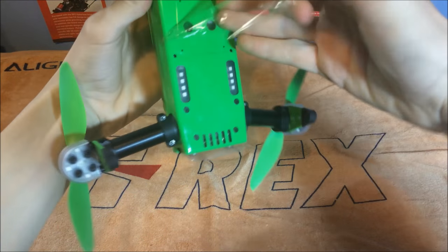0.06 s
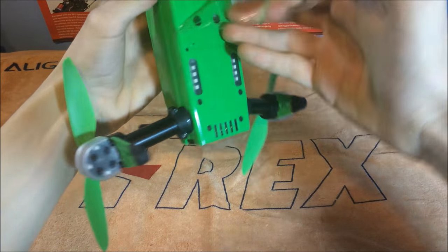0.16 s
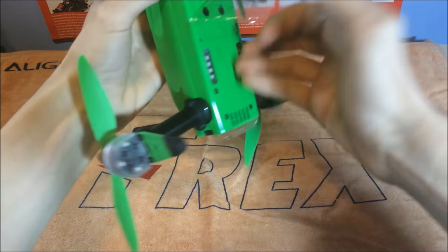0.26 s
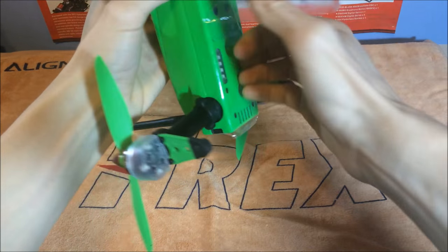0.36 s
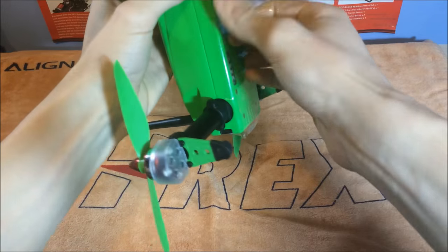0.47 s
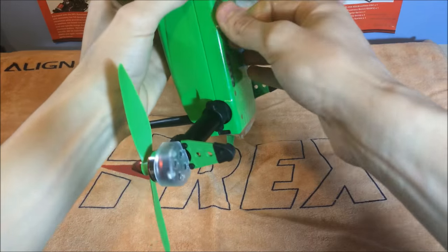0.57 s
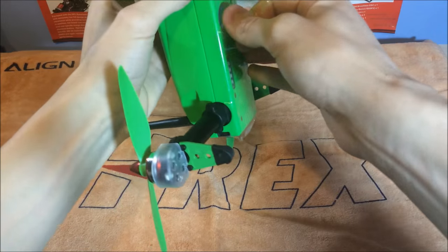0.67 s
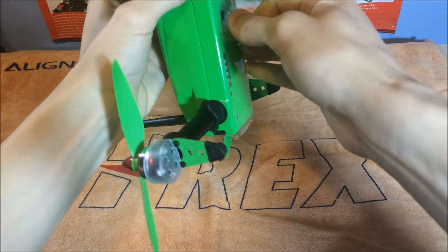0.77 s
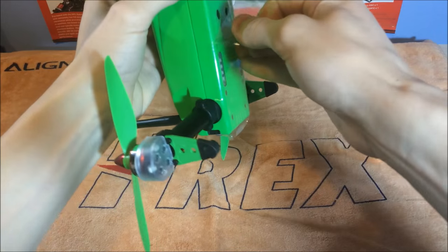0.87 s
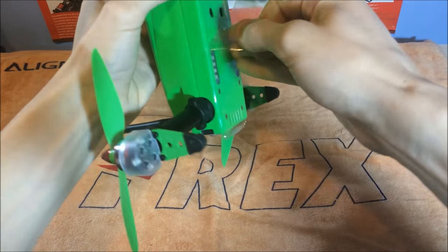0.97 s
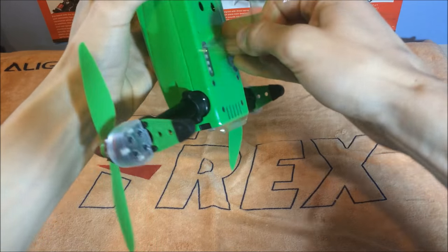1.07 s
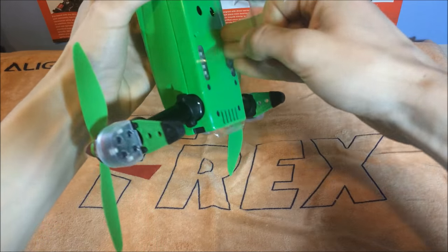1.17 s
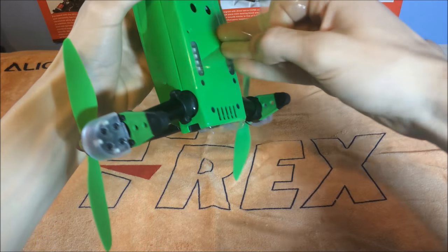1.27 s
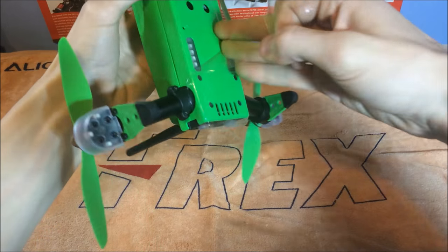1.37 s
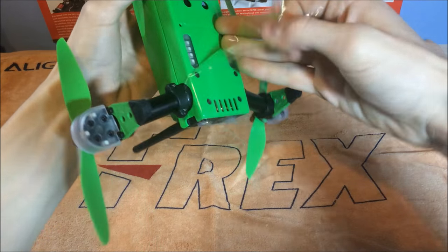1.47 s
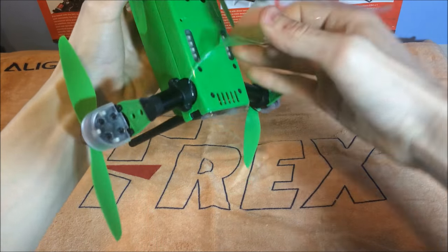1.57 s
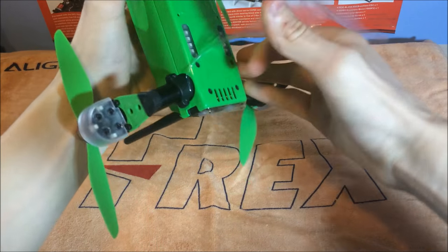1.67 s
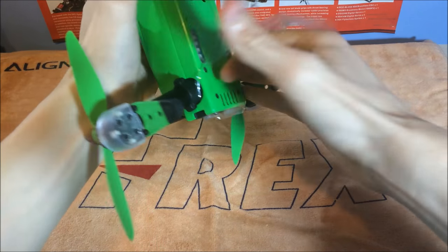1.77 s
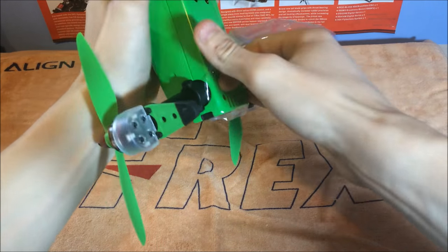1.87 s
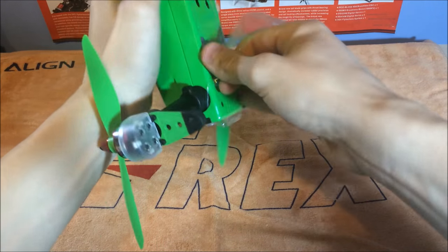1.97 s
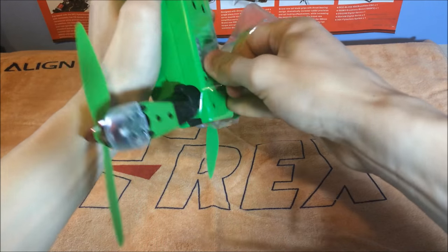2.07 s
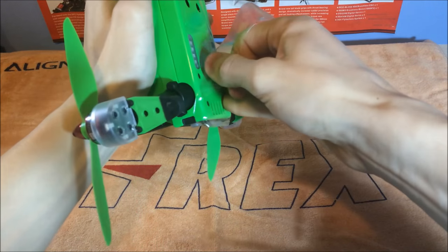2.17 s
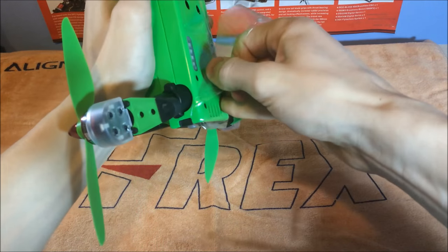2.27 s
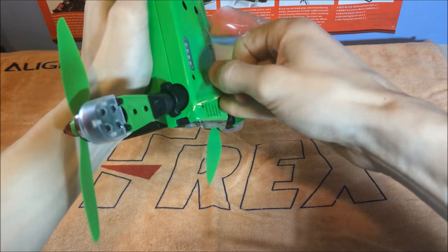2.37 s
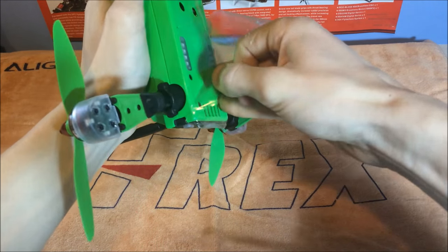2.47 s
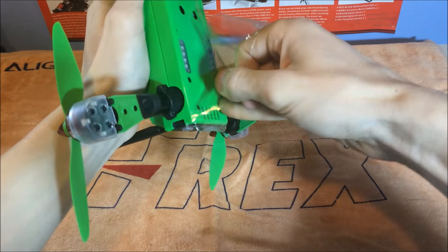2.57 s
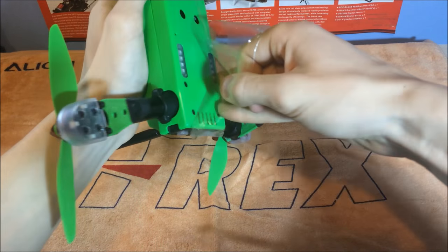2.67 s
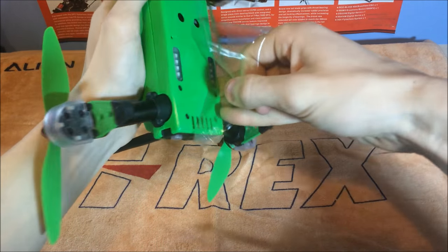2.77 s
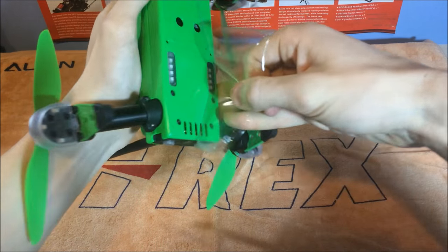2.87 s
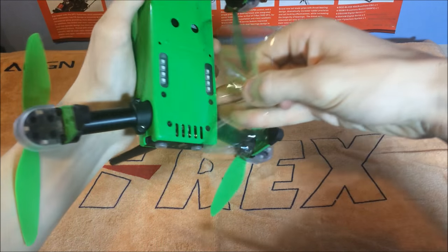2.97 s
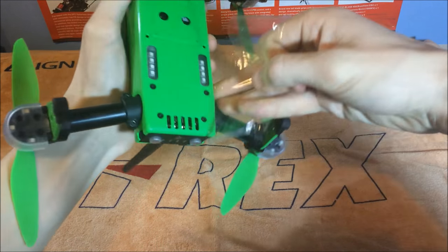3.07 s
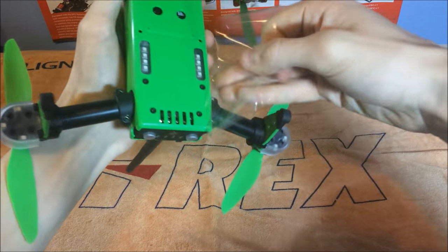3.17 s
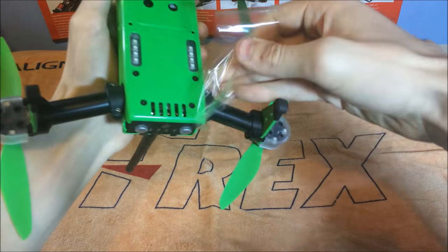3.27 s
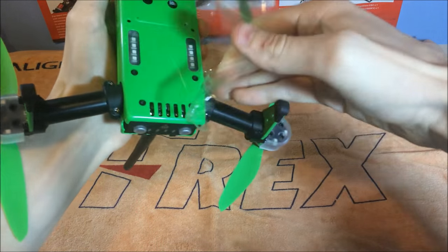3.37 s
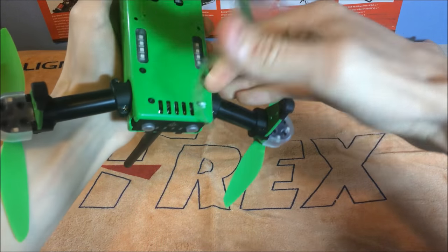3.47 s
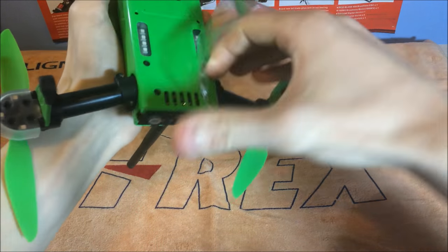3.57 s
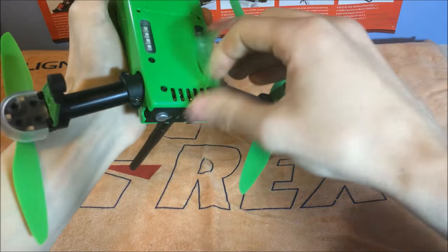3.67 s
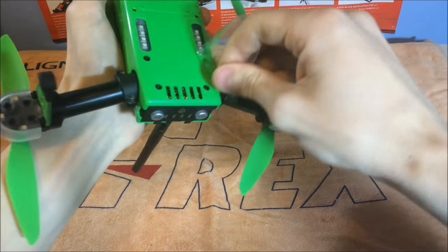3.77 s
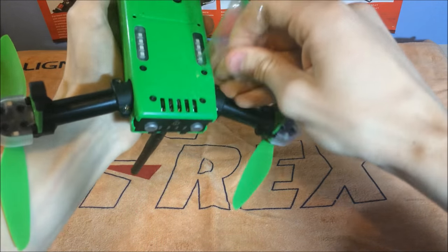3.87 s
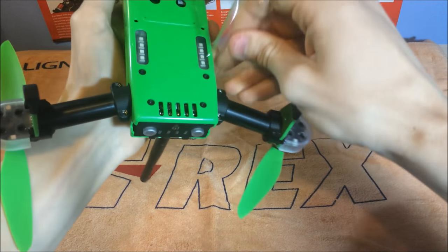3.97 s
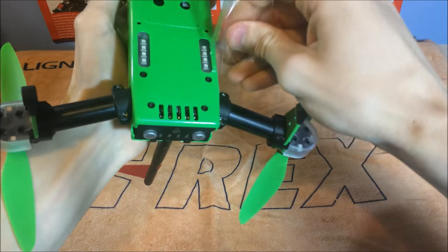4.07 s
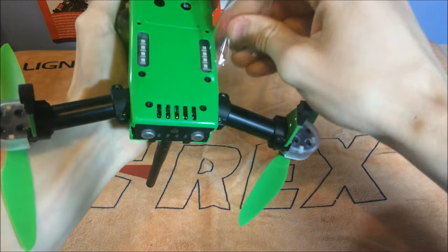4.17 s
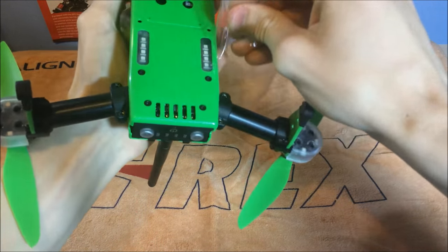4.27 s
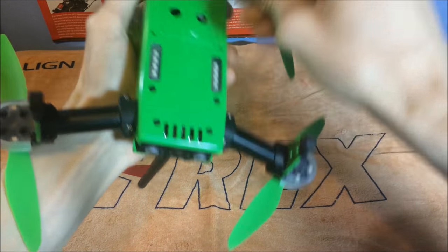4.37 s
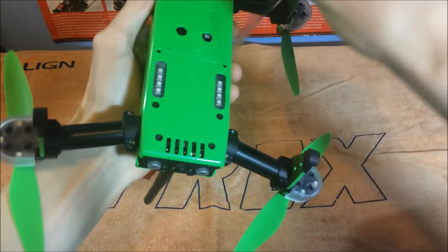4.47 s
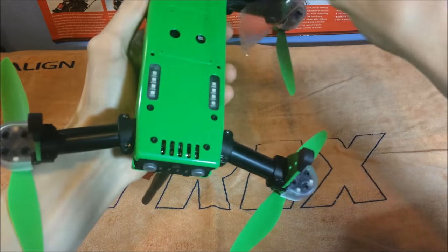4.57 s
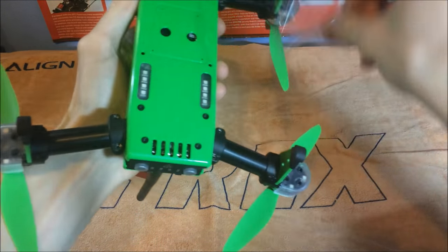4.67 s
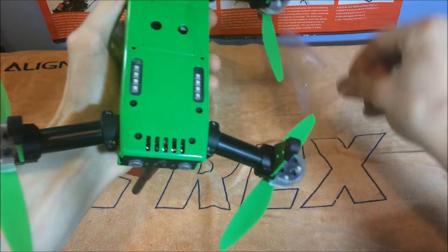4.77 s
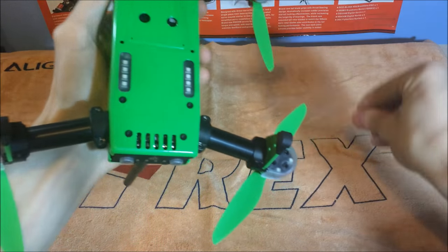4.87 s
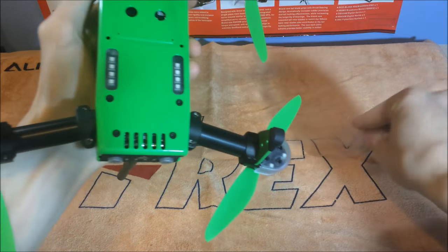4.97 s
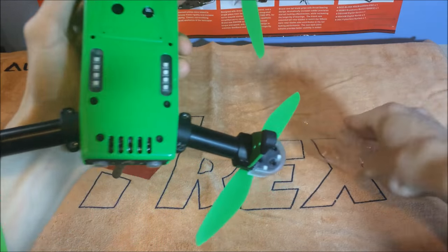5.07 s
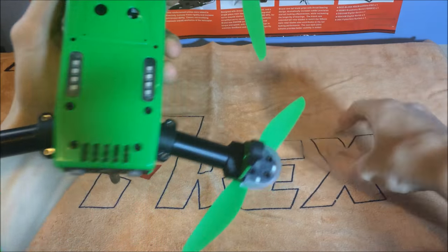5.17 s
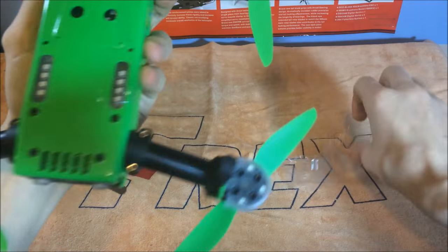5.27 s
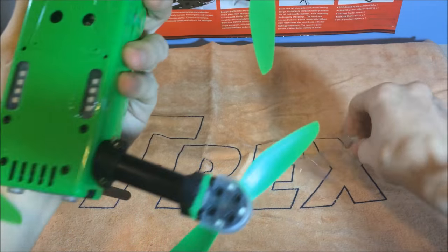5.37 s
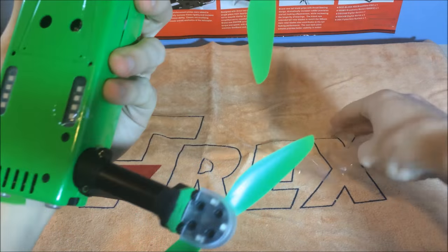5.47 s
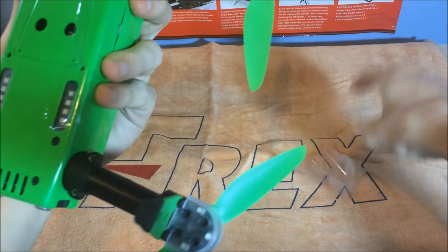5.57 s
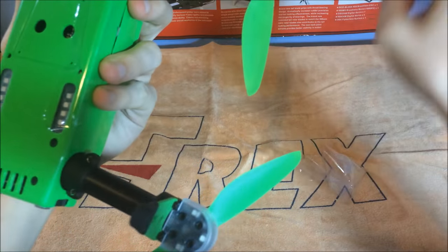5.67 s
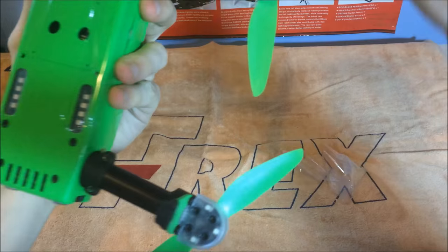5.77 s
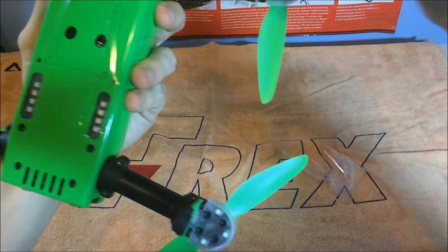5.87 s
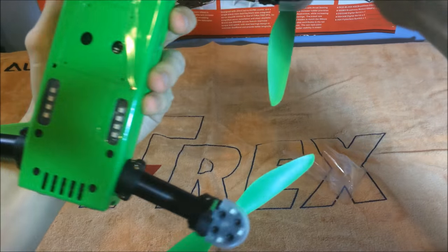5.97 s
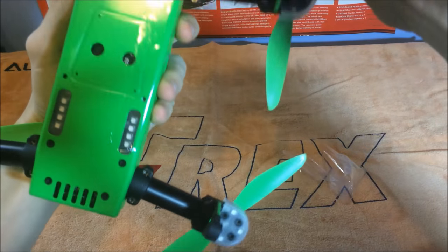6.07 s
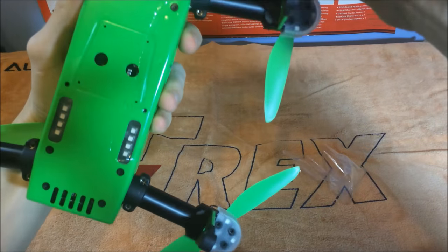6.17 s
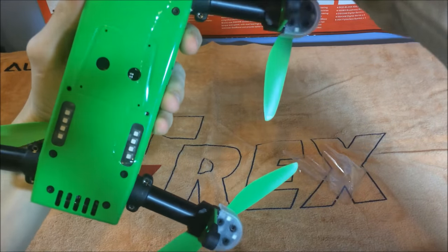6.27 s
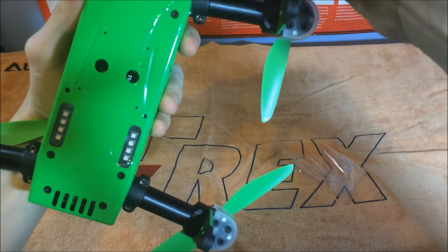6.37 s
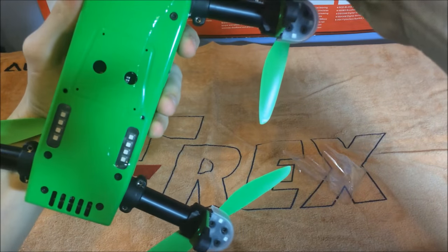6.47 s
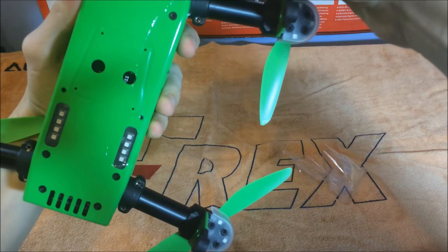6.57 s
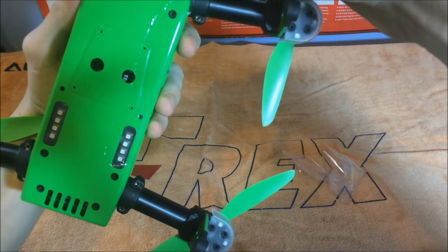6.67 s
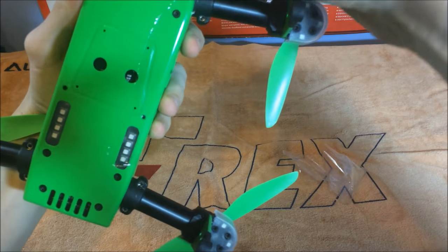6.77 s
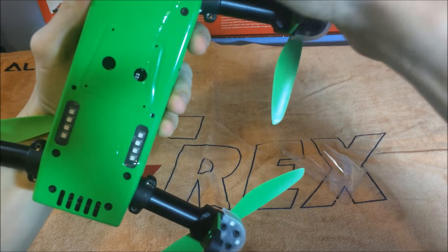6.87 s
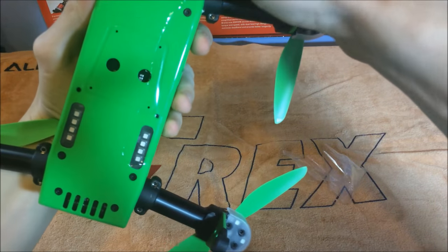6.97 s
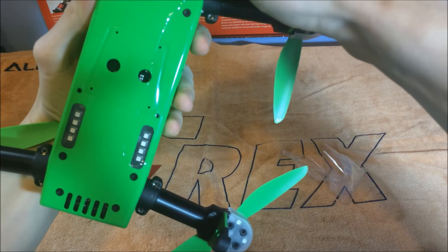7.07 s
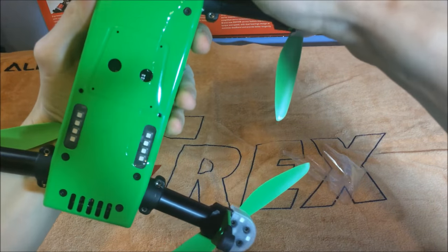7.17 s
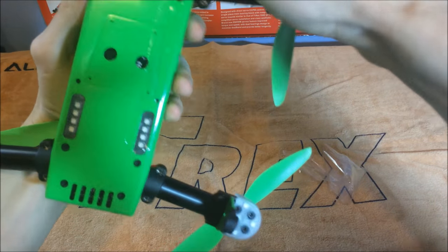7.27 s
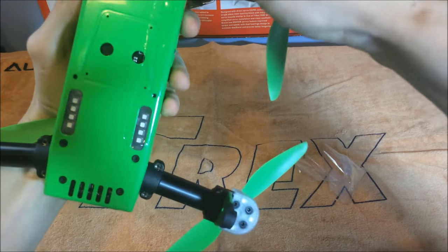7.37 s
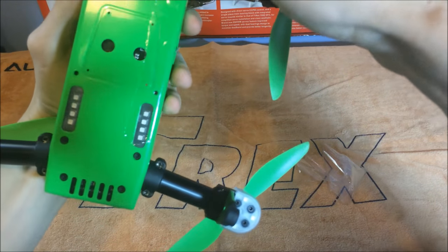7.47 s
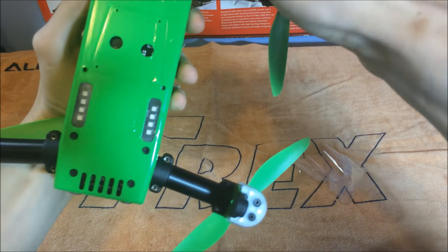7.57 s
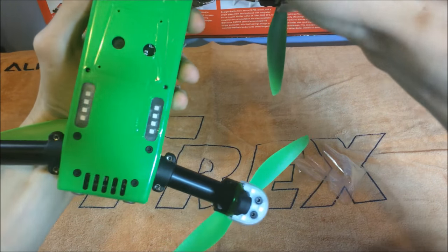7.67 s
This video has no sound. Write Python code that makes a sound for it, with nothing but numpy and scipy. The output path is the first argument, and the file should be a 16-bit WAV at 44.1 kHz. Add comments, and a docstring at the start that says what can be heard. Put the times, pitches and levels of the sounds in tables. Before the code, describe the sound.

Close up in a small quiet room, hands peel thin stiff plastic film from a hollow plastic drone shell. A quick burst of snaps opens, then sparse cracks and soft hissing pulls. After a quieter stretch comes a dense run of sharp crackles and crumpling. The film is dropped, leaving faint room noise, then a few dry clicks at the end.

```python
"""Small quiet room: clear protective film is peeled off the plastic shell of a small drone, close by.
Each pull parts the glue in a fine hiss of random clicks; the stiff film buckles in snaps, crumples and ticks,
all of them short excitations filtered by the resonances of film and shell.
Dragged film draws out rough narrow-band notes; hands bump the hollow shell as damped sines.
The room answers the film; low grip rustle, room noise and a faint whine lie beneath."""
import sys
import numpy as np
from scipy import signal
from scipy.fft import rfft, irfft
from scipy.io import wavfile
from scipy.ndimage import uniform_filter1d

SR = 44100
rng = np.random.default_rng(int(sys.argv[2]) if len(sys.argv) > 2 else 0)


def wav_out(sig):
    """Save sig, one row per channel (or a flat mono array), as 16-bit PCM at SR to the path in sys.argv[1]."""
    wavfile.write(sys.argv[1], SR, np.round(np.clip(np.atleast_2d(sig).T, -1, 1) * 32767).astype(np.int16))


N = 340452
EDGE_HZ = 15500
TAPS = 2048
HZ = np.fft.rfftfreq(TAPS, 1 / SR)
TIME = np.arange(N) / SR


def gain_of(db):
    """Decibels to amplitude."""
    return 10 ** (np.asarray(db) / 20)


def evened(x):
    """Scales to rms 1."""
    return x / np.sqrt(np.mean(x ** 2) + 1e-20)


def read(points, hz):
    """Reads a table along a log-frequency axis."""
    f, value = np.transpose(points)
    return np.interp(np.log(hz + 1), np.log(f + 1), value)


def add(mix, s, sound):
    """Mixes a sound in at time s."""
    part = mix[max(round(s * SR), 0):][:len(sound)]
    part += sound[:len(part)]


def noise(points):
    """Steady noise of rms 1 with the given spectrum."""
    gain = gain_of(read(points, np.fft.rfftfreq(N, 1 / SR)))
    return evened(irfft(rfft(rng.standard_normal(N)) * gain, N))


def ringing(db):
    """Causal (minimum-phase) impulse response of energy 1 with the given spectrum."""
    log_gain = np.log(gain_of(np.concatenate([db, db[-2:0:-1]])))
    min_phase = np.exp(np.conj(signal.hilbert(log_gain)))
    response = np.fft.ifft(min_phase).real[:TAPS // 2]
    return response / np.linalg.norm(response)


def peak(hz, width_hz):
    """Bell of height 1 around a frequency."""
    return 1 / (1 + (2 * (HZ - hz) / width_hz) ** 2)


def crease(hz, lift_db, octaves):
    """The broad resonance of one facet of film, in dB."""
    return lift_db / (1 + (np.log2((HZ + 1) / hz) / octaves) ** 2)


def colour(s, body_db, bright_db, shell_share, hollow_db=8, slope_db_per_octave=7):
    """Film spectrum in dB at time s: slack patches have body, taut ones are bright, stuck ones ring the shell."""
    # Film colour: freq_hz, density_db (relative, per Hz)
    film_points = [(60, -6.5), (450, -6), (750, 0.5), (1300, 1), (1800, -0.5), (2900, -2), (4700, -2),
                   (7500, 3), (9700, 0.5), (12500, 3), (15200, -2.5)]
    # Resonances of the hollow shell under the film: freq_hz, width_hz, lift_db (at shell_share 1)
    shell_peaks = [(1040, 110, 1.5), (1362, 180, 0.5), (2300, 200, 5.5), (2890, 150, 6.5), (3263, 400, 7.5),
                   (4065, 690, 5), (5800, 250, 4), (7300, 430, 1.5)]
    # Loose flap, lower as it grows, higher again once crumpled: time_s, lowest_resonance_hz
    flap_points = [(0, 680), (1.9, 726), (2.3, 500), (4.8, 416), (5.5, 546)]
    flap_hz = np.interp(s, *np.transpose(flap_points))
    flap = 4 * peak(flap_hz, width_hz=190)
    flap -= hollow_db * peak(566 + .42 * flap_hz, width_hz=130)  # dip above the resonance
    # the flap radiates little below its lowest resonance
    flap -= slope_db_per_octave * np.clip(np.log2(flap_hz / (HZ + 1)), 0, 4)
    low = read([(1000, 1), (2400, 0)], HZ)
    high = read([(3400, 0.063), (11500, 0.93)], HZ)
    shell = sum(db * peak(hz, width_hz) for hz, width_hz, db in shell_peaks)
    top = np.clip((HZ - EDGE_HZ) / 50, 0, 30)
    return read(film_points, HZ) + flap + body_db * low + bright_db * high + shell_share * shell - top


def grains(size, per_s, spread_db):
    """Random tiny clicks, a few of them much larger than the rest; rms 1."""
    sizes = gain_of(spread_db * np.minimum(rng.exponential(1, size), 4))
    return evened(sizes * rng.choice([-1, 1], size) * (rng.random(size) < per_s / SR))


def swell(start_s, end_s, rise_db_per_s, fall_db_per_s, t, build_db=0):
    """Gain of one hand movement: swells up to its start, holds or builds, dies away after its end."""
    hold_db = build_db * (np.clip((t - start_s) / (end_s - start_s), 0, 1) - .5)
    rise_db = rise_db_per_s * np.maximum(start_s - t, 0)
    fall_db = fall_db_per_s * np.maximum(t - end_s, 0)
    return gain_of(hold_db - rise_db - fall_db)


def snaps(crack=5, flutter_db=-19, flutter_s=0.0065, shell_share=0.61, room_share=.9):
    """A facet flips with one crack, rattles briefly and flutters on. Rows: to the microphone, into the room."""
    # One buckle of film or tick of shell: start_s, energy_db (over 1 ms), body_db (lift below 1 kHz),
    # bright_db (lift toward 11.5 kHz), facet_hz, rattle_ms (scales rattle rise and decay, at least .25)
    snap_rows = [(0.181, -31, 0, -24, 2190, .6), (0.2088, -21.5, 7.5, -12, 4000, 1.1),
                 (0.2126, -12.5, 7.5, 2.5, 3230, 1.7), (0.226, -16.5, -22, -4, 10200, 0.36),
                 (0.2328, -14.5, -27, 5, 8050, 0.37), (0.2406, -15, -10, 6, 8250, .75),
                 (0.2464, -17, -19, -6, 6030, 3.6), (0.2601, -15, -27, 0.5, 2920, 1.5),
                 (0.288, -20.5, 2, -10, 750, 2.1), (0.305, -24.5, -10, -5, 3470, 2.1),
                 (0.362, -42.5, -15, -11, 2950, 1.1), (0.411, -38.5, -1, -12, 3530, 1.9),
                 (0.6439, -30, -3, -8.5, 7680, .6), (0.6475, -18, -4.5, -9, 3120, 0.77),
                 (0.7103, -23.5, 3, -15.5, 2650, 2.3), (0.7812, -14, -0.5, -14, 2600, 0.28),
                 (0.8285, -36, -6, -11.5, 7880, .5), (0.9154, -27, 1.5, -27, 2380, 1.3),
                 (0.9563, -20.5, -10, 2, 10360, .5), (0.9653, -6.5, -0.5, -6.5, 3370, .6),
                 (0.9721, -15, -2.5, -12.5, 4470, 3.8), (1.036, -29, 1, -12, 3230, 2),
                 (1.0721, -30, -10, 10, 7840, .5), (1.1278, -20, 2.5, -6, 1060, 0.85),
                 (1.1752, -12.5, 2, -11, 12000, 0.66), (1.5156, -33, -15, -12, 12830, .4),
                 (1.6482, -32.5, -4, -18, 3070, 1.1), (1.6792, -23.5, -9, -19, 2270, 1.8),
                 (1.704, -30.5, -15, -12, 2300, 1.1), (1.8665, -40, -24, -10, 3500, 0.99),
                 (1.885, -27.5, 5.5, -14, 2480, 3.6), (2.071, -25, -11, -29, 2820, 0.7),
                 (2.0754, -23, -4.5, -11.5, 3070, 2.5), (2.1107, -31, -21, -33, 2740, 1.1),
                 (2.1408, -31, 3.5, -30, 2840, .9), (2.233, -36.5, -4, -17, 2580, 1.4),
                 (2.38, -40, 8, -37, 2360, 1), (2.581, -19.5, -12, -12.5, 11800, 0.49),
                 (2.624, -23.5, -5, -10.5, 2330, 2.6), (2.737, -32.5, -26, 4, 6640, 0.96),
                 (2.7912, -23.5, 1.5, -2.5, 9400, 2.7), (2.8111, -26, -3, -6.5, 9800, 2.1),
                 (3.0883, -29.5, -22, -9, 6060, 1.1), (3.1382, -26, -5.5, -7, 2880, 0.82),
                 (3.1716, -19.5, -4, -3, 6200, 1.8), (3.1996, -30.5, -6, -11.5, 2793, 2.2),
                 (3.2584, -34, 7, -17, 2450, 2.1), (3.286, -40.5, 1.5, -5.5, 6200, .75),
                 (3.3112, -29.5, -2, -3.5, 2540, 1.7), (3.3335, -25, -11, 9, 7450, 1),
                 (3.357, -32, -2.5, -3.5, 8180, .5), (3.3719, -20, -2.5, -9, 3420, .7),
                 (3.396, -29.5, -16, -6, 2410, 1.1), (3.4242, -8.5, -3.5, -3.5, 8700, 1.2),
                 (3.4377, -15, -6.5, -16, 2810, 1.2), (3.4405, -10.5, -12.5, -1.5, 2770, 1.2),
                 (3.4717, -12, -3.5, -10.5, 2220, 0.87), (3.4875, -15, -6.5, -10.5, 5840, 3),
                 (3.5103, -20.5, -3.5, -9.5, 7840, .8), (3.5388, -19, -3, -1, 7400, 0.61),
                 (3.5486, -16, -4, -11, 5500, 2.3), (3.6383, -34, -13, 6, 6850, 2.3),
                 (3.6772, -39.5, -4.5, -13.5, 3880, 1.4), (3.743, -32.5, 1.5, -11, 2863, 2.1),
                 (3.831, -24.5, -10, -7, 3050, 1.1), (3.8464, -17.5, -14.5, 8, 12920, 0.44),
                 (3.8588, -12.5, -7, -2, 13450, .8), (3.8918, -20.5, -8, 4, 6190, .45),
                 (3.9263, -14, -13.5, -10.5, 4900, .5), (3.9813, -24, -6, -0.5, 5200, .3),
                 (4.0312, -13.5, -7, -9, 7400, .3), (4.034, -15, -8.5, -11.5, 11800, 0.62),
                 (4.0994, -24.5, 2.5, -10, 4600, .6), (4.109, -30, -2.5, -13.5, 2280, .85),
                 (4.1501, -21, .5, -6.5, 11240, .25), (4.201, -14, -28.5, 4, 11600, .6),
                 (4.2246, -31.5, -9, -14.5, 4103, 1.2), (4.2303, -19, -14.5, -0.5, 5400, 1.1),
                 (4.2568, -16, -4, 4, 5510, 1.8), (4.2763, -21, -5, -18.5, 7410, .8),
                 (4.3665, -28.5, -5.5, -9.5, 2080, 3.3), (4.387, -39.5, -16, -5.5, 4050, .9),
                 (4.4748, -28.5, -5.5, -11.5, 1940, 1.6), (4.4795, -9, -8.5, -1.5, 5270, 0.52),
                 (4.4871, -21.5, -2, -7.5, 5370, 1.3), (4.6081, -26, -9, -13.5, 12450, 2.5),
                 (4.697, -29.5, 0, 2, 7970, 0.68), (4.7036, -24.5, -4, -15, 1920, 2.4),
                 (4.7318, -28.5, -3, -6, 6300, 1.5), (4.7547, -27, -5, -25, 2090, 1.7),
                 (4.8402, -13.5, -5, -3, 2520, 2), (4.9187, -30.5, -5, -10, 2430, 2.7),
                 (4.9597, -32, -12, -7, 8550, 1.8), (5.0036, -32.5, -14, -9, 3250, 0.51),
                 (5.028, -26, -11, -8, 7200, 2.5), (5.0338, -18.5, -27, -6, 11100, 1),
                 (5.0527, -20.5, 5.5, 4, 7300, 2.05), (5.1292, -18, -10.5, -3, 3330, 3.3),
                 (5.1443, -21.5, -25, -4.5, 3010, 1.9), (5.1643, -19, -9, 5, 12000, .7),
                 (5.2175, -38, -3, 6, 9000, 1.9), (5.2641, -29, -8, -22, 2600, 1.3),
                 (5.375, -32.5, -4.5, -.5, 9700, 1), (5.5114, -27, -7.5, -4.5, 12580, 3),
                 (5.5633, -8.5, -14.5, -8, 6170, 0.31), (5.689, -41, 6, 0, 6290, 1.9),
                 (5.8176, -51, 1, -1, 2350, 1), (6.0535, -50, 5, 9, 728, 2),
                 (6.611, -49.5, -4.5, 6, 5660, 1.5), (6.6926, -51, 1, -1, 7120, .5),
                 (6.8511, -52.5, 2, -4.5, 12530, .7), (6.9163, -47.5, 0.5, -4, 10500, .7),
                 (6.9354, -49.5, 3, -37, 1244, 1.8), (7.3616, -28.5, -4, -6, 1850, 0.57),
                 (7.4003, -14, 2, -6.5, 13600, 0.4), (7.47, -30, -13, -6, 7800, .25),
                 (7.537, -20, -6.5, 1, 6900, 0.79)]
    out, t = np.zeros((2, N)), np.arange(TAPS // 2) / SR
    for s, db, body_db, bright_db, facet_hz, ms in snap_rows:
        scale_s = max(ms, .25) / 1000
        onset = 1 - np.exp(-t / (.3 * scale_s))
        burst = np.exp(-t / (1.4 * scale_s))
        rattle = onset * (burst + gain_of(flutter_db) * np.exp(-t / flutter_s))
        beamed = colour(s, body_db, bright_db, shell_share)
        beamed = beamed + crease(facet_hz, lift_db=10.0, octaves=0.19)
        # summed over all directions, the colour of a single facet evens out
        spread = colour(s, room_share * body_db, room_share * bright_db, shell_share)
        spread = spread + crease(facet_hz, lift_db=5.0, octaves=0.31)
        for path, spectrum in zip(out, (beamed, spread)):
            drive = rng.standard_normal(len(t)) * rattle
            drive[0] = -crack
            snap = signal.fftconvolve(drive, ringing(spectrum))
            snap *= np.sqrt(SR / 1000) / np.linalg.norm(snap)  # rms 1 if spread over 1 ms
            add(path, s, gain_of(db) * snap)
    return out


def crumples(trim_db=-1, shell_share=0.78, buckles=20, facets=4):
    """Facets of random pitch each buckle about as often in any fold: quick folds tear, slow ones crackle."""
    # Runs of tiny buckles as the film folds: start_s, end_s, level_db (before trim_db),
    # body_db (lift below 1 kHz), bright_db (lift toward 11.5 kHz)
    fold_rows = [(0.197, 0.275, -33.5, -4.5, -12), (1.638, 1.72, -46.5, -0.5, -15),
                 (1.749, 1.801, -40, 5, -9), (2.064, 2.09, -34, -2.5, -14), (2.128, 2.152, -42, -4, -34),
                 (3.295, 3.355, -42.5, -14, -8), (3.425, 3.445, -24.5, -2, -3),
                 (3.462, 3.485, -19.5, 3, -8.5), (3.49, 3.517, -25.5, -9, -4.5),
                 (3.84, 3.868, -31, -7.5, -2.5), (3.921, 3.929, -25, -1, -12),
                 (4.255, 4.299, -40, -3.5, -7), (4.767, 4.799, -33.5, 1, -11), (4.808, 4.857, -30, -4, -8),
                 (4.86, 4.9, -42, -23, -11), (5.029, 5.072, -42, -5, -22),
                 (5.121, 5.162, -31.5, -4.5, -1.5), (5.284, 5.324, -44, 6.5, -12),
                 (5.365, 5.387, -40, -4, -10), (5.43, 5.466, -43.5, 0, -7), (5.53, 5.571, -41, 8, 9),
                 (5.556, 5.576, -24, -6.5, 0.5), (6.413, 6.447, -63.5, 3.5, -19.5),
                 (7.194, 7.249, -64.5, 3, -19.5), (7.642, 7.664, -56, 8.5, -7)]
    out = np.zeros(N)
    for start_s, end_s, db, body_db, bright_db in fold_rows:
        size, run = int(max(end_s - start_s, .004) * SR), 0
        film = colour(start_s, body_db, bright_db, shell_share)
        for hz in np.exp(rng.uniform(np.log(2000), np.log(12000), facets)):
            clicks = grains(size, per_s=buckles * SR / size, spread_db=3.0)
            clicks = clicks * signal.windows.tukey(size, .3)
            facet = ringing(film + crease(hz, lift_db=5.0, octaves=0.13))
            run = run + signal.fftconvolve(clicks, facet)
        run = run * np.sqrt(size / (np.sum(run ** 2) + 1e-20))
        add(out, start_s, gain_of(db + trim_db) * run)
    return out


def pulling(t):
    """Strength, body dB and bright dB of the sliding film at times t; colour is weighted by pull power."""
    # Pulls dragging film off the shell and through the fingers: start_s, end_s,
    # level_db (relative strength), body_db (lift below 1 kHz), bright_db (lift toward 11.5 kHz)
    pull_rows = [(0, 0.104, -46, 6, -9), (0.44, 0.555, -59.5, 8.5, 2), (0.684, 0.703, -48, 1.5, -18),
                 (0.86, 0.96, -50.5, -2, -4.5), (1.01, 1.195, -42, 3.5, -1), (1.326, 1.529, -47.5, 3, -7.5),
                 (1.645, 1.767, -51.5, 6.5, -10), (1.9, 1.948, -55.5, 7.5, -20),
                 (2.058, 2.252, -53, 3.5, -10), (2.253, 2.41, -60.5, -1, 5), (2.444, 2.613, -51, 2.5, 4),
                 (2.789, 2.846, -48, -1, -4.5), (2.922, 2.922, -42.5, -1, -13), (2.962, 3.027, -49, 1, -1),
                 (3.052, 3.162, -44.5, 5, -4), (3.397, 3.603, -45, -5, -21),
                 (3.733, 3.88, -56.5, -0.5, -2.5), (3.92, 4.02, -39, -4, -7),
                 (4.104, 4.128, -47.5, -3.5, -5), (4.353, 4.555, -59.5, -1.5, -6.5),
                 (4.692, 4.918, -47, -4, -11), (5.07, 5.15, -40.5, -5, -7), (5.233, 5.443, -55, -1, -6),
                 (5.483, 5.633, -49, 1.5, -4)]
    # last row: the film whispers in the fingers until it is dropped
    rows = np.array(pull_rows + [(0.0035, 5.68, -65.5, 2, -0.5)])
    rise_db_per_s, fall_db_per_s, build_db = 329.5, 261.5, 0.5  # builds with the tension
    gains = [swell(start_s, end_s, rise_db_per_s, fall_db_per_s, t, build_db) * gain_of(db)
             for start_s, end_s, db in rows[:, :3]]
    power = np.array(gains) ** 2
    total = power.sum(0) + 1e-20
    return np.sqrt(total), rows[:, 3] @ power / total, rows[:, 4] @ power / total


def peel(trim_db=-3.0, shell_share=0.96, stutter_db=2.1, size=512):
    """Thousands of glue threads part each second; the pull sticks and slips a little."""
    stutter = uniform_filter1d(rng.standard_normal(N), size=300)
    stutter = evened(uniform_filter1d(stutter, size=300))
    threads = grains(N, per_s=12000, spread_db=1.5) * gain_of(stutter_db * stutter)
    _, t, z = signal.stft(threads, SR, nperseg=size, nfft=TAPS)
    strength, body_db, bright_db = pulling(t)
    shape = gain_of(colour(t[:, None], body_db[:, None], bright_db[:, None], shell_share))
    shape /= np.sqrt(np.mean(shape ** 2, axis=1, keepdims=True))
    hiss = signal.istft(z * shape.T, SR, nperseg=size, nfft=TAPS)[1][:N]
    return evened(hiss) * np.interp(TIME, t, strength) * gain_of(trim_db)


def ticks(moving_db=-12, settle_db=-82, facets=14):
    """Stray small creases tick all over the sheet whenever it moves, and faintly as it settles."""
    out = np.zeros(N)
    film = colour(TIME[-1] / 2, 0, -4.5, shell_share=0.64)
    for hz in np.geomspace(600, 12000, facets):
        facet = ringing(film + crease(hz, lift_db=14.5, octaves=.3))
        out += signal.oaconvolve(grains(N, per_s=8, spread_db=4.0), facet)[:N]
    t = TIME[::TAPS // 8]
    strength = np.interp(TIME, t, pulling(t)[0])
    return evened(out) * (strength * gain_of(moving_db) + gain_of(settle_db))


def rough_note(length_s, hz, width_hz):
    """Fine stick and slip, as noise in a narrow resonance while the film slides; rms 1."""
    size = int(max(length_s, .02) * SR)
    edges_hz = [hz - width_hz / 2, hz + width_hz / 2]
    band = signal.butter(2, edges_hz, "bandpass", fs=SR, output="sos")
    note = signal.sosfilt(band, rng.standard_normal(size + TAPS))[TAPS:]
    return evened(note * signal.windows.tukey(size, .6))


def drags():
    """Each drag draws out one note; the hardest tug rings all resonances of the taut sheet at once."""
    # Film or a finger dragged over the shell: start_s, end_s, level_db, pitch_hz, width_hz
    drag_rows = [(0.209, 0.346, -45.5, 725, 121), (0.663, 0.747, -53.5, 690, 130),
                 (1.28, 1.57, -55.5, 1400, 150), (1.301, 1.5, -58, 1025, 180),
                 (2.199, 2.587, -65, 2540, 700), (2.873, 3.015, -62.5, 1000, 200),
                 (4.792, 4.867, -52.5, 420, 150), (5.259, 5.423, -54, 2550, 700),
                 (6.41, 6.454, -67, 2400, 1400), (7.109, 7.158, -68.5, 1500, 1400)]
    # Resonances of the taut sheet: freq_hz, width_hz, level_db
    sheet_rows = [(265, 82, -42), (465, 100, -35), (2250, 550, -27.5)]
    rip_start_s, rip_end_s = 3.46, 3.509
    out = np.zeros(N)
    for start_s, end_s, db, hz, width_hz in drag_rows:
        add(out, start_s, gain_of(db) * rough_note(end_s - start_s, hz, width_hz))
    for hz, width_hz, db in sheet_rows:
        add(out, rip_start_s, gain_of(db) * rough_note(rip_end_s - rip_start_s, hz, width_hz))
    return out


def bumps(trim_db=1, puff=.35):
    """Soft blows: the hand-held shell swings as a damped sine with a dull puff, and its modes ring briefly."""
    # Knocks of the hands: start_s, swing_db (before trim_db), pitch_hz, decay_s, ring_db (gain of shell modes)
    bump_rows = [(0.211, -59, 176, 0.015, -60), (0.9632, -51, 150, 0.0056, -49),
                 (1.163, -40, 60, .007, -72), (1.1733, -21, 75, 0.0028, -62),
                 (1.1759, -24.5, 493, 0.0023, -54), (2.625, -47.5, 303, .008, -62),
                 (4.481, -51, 174, 0.0065, -51), (7.3997, -41.5, 149, .0045, -46.5)]
    # Modes of the knocked shell: freq_hz, level_db (relative), t60_s
    mode_rows = [(1190, -6.5, .15), (1405, 0.5, .18), (1803, -4, .16), (2326, -0.5, .16), (2740, -5, .16),
                 (3478, -7, .15)]
    out, t = np.zeros(N), np.arange(SR // 6) / SR
    ring = sum(gain_of(db - 60 * t / t60_s) * np.sin(2 * np.pi * hz * t) for hz, db, t60_s in mode_rows)
    band = signal.butter(2, [120, 450], "bandpass", fs=SR, output="sos")
    for s, db, hz, decay_s, ring_db in bump_rows:
        dull = evened(signal.sosfilt(band, rng.standard_normal(len(t))))
        blow = (np.sin(2 * np.pi * hz * t) + puff * dull) * np.exp(-t / decay_s)
        add(out, s, gain_of(db + trim_db) * blow + gain_of(ring_db) * ring)
    return out


def room(x, first_s=0.0024):
    """Dense reflections from the table and near walls, each band dying at its own speed."""
    # Room decay: freq_hz, t60_s
    decay_points = [(200, 0.12), (700, 0.2), (1800, 0.22), (4500, 0.16), (9000, 0.15), (15000, 0.15)]
    taps = rng.choice([-1., 1.], SR // 2) * (rng.random(SR // 2) < 5000 / SR)
    hz, t, z = signal.stft(taps, SR, nperseg=256)
    decay = gain_of(-60 * t / read(decay_points, hz)[:, None])
    tail = signal.istft(z * decay, SR, nperseg=256)[1]
    tail *= np.clip(np.arange(len(tail)) / SR / first_s, 0, 1) ** 2  # reflections build up over first_s
    return signal.fftconvolve(x, tail / np.linalg.norm(tail))[:N]


def background(floor_db=-67.5, uneven_db=3, fade_db_per_s=62, resting_db=-79.5, whine_hz=1960):
    """Quiet shaped room noise, the uneven low noise rustle of the grip, and a faint sine whine."""
    # Room noise spectrum: freq_hz, density_db (relative, per Hz)
    floor_points = [(15, -29.5), (45, -5), (150, -4), (330, -1.5), (600, -6), (1200, -8), (2500, -13.5),
                    (5000, -21), (7500, -18.5), (10000, -21.5), (13000, -20), (15500, -23.5)]
    # Faint thin tone: time_s, level_db
    whine_points = [(5.6, -100), (5.95, -84), (6.9, -82), (7.25, -100)]
    # Hands shifting their grip on the shell: start_s, end_s, level_db
    grip_rows = [(0, 0.296, -64.5), (1.58, 2.498, -65.5), (3.8, 4.54, -64.5), (6.046, 6.95, -69.5)]
    lumps = uniform_filter1d(rng.standard_normal(N), size=1500)
    lumps = evened(uniform_filter1d(lumps, size=1500))
    rustle = noise([(20, -33), (48, -4.5), (110, -7.0), (220, -5.5), (400, -9.5), (800, -20.5), (3000, -44)])
    grip = evened(rustle * gain_of(uneven_db * lumps))
    moving = np.max([gain_of(db) * swell(start_s, end_s, fade_db_per_s, fade_db_per_s, TIME)
                     for start_s, end_s, db in grip_rows], axis=0)
    whine_gain = gain_of(np.interp(TIME, *np.transpose(whine_points)))
    whine = np.sqrt(2) * np.sin(2 * np.pi * whine_hz * TIME) * whine_gain
    return gain_of(floor_db) * noise(floor_points) + grip * np.hypot(moving, gain_of(resting_db)) + whine


def scene():
    """Film and shell close by, in a small room."""
    direct, radiated = snaps()
    rustle = crumples() + peel() + ticks()
    reflected = gain_of(-10.5) * room(radiated + rustle)
    return (direct + rustle + reflected + drags() + bumps() + background())[None]


def record(dry):
    """The microphone drops the deepest bass, the sharpest snaps overload the input; then the band limit."""
    highpass = signal.butter(2, 42, "highpass", fs=SR, output="sos")
    clipped = np.clip(signal.sosfilt(highpass, dry), -.78, .78)
    lowpass = signal.firwin(255, EDGE_HZ, window=("kaiser", 9), fs=SR)
    return signal.oaconvolve(clipped, lowpass[None], "same")


dry = scene()
out = record(dry)
wav_out(out)
```